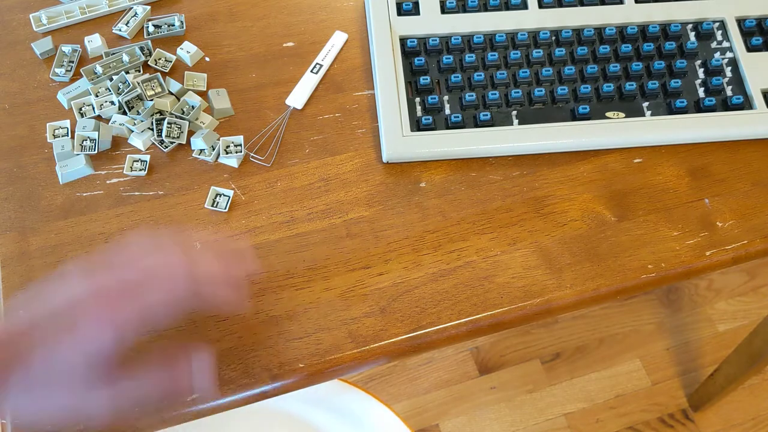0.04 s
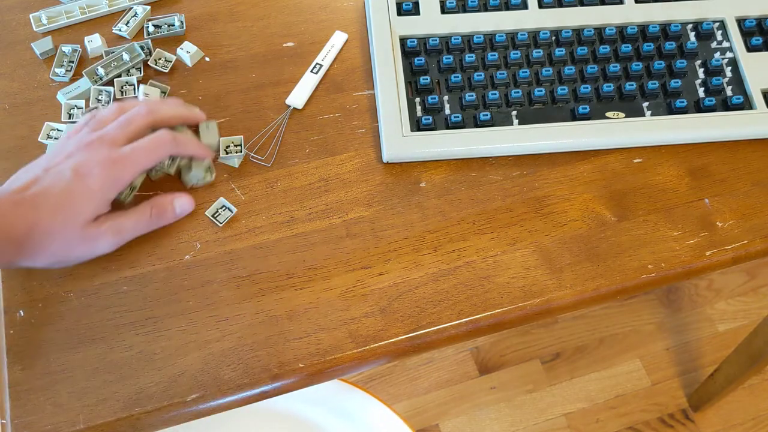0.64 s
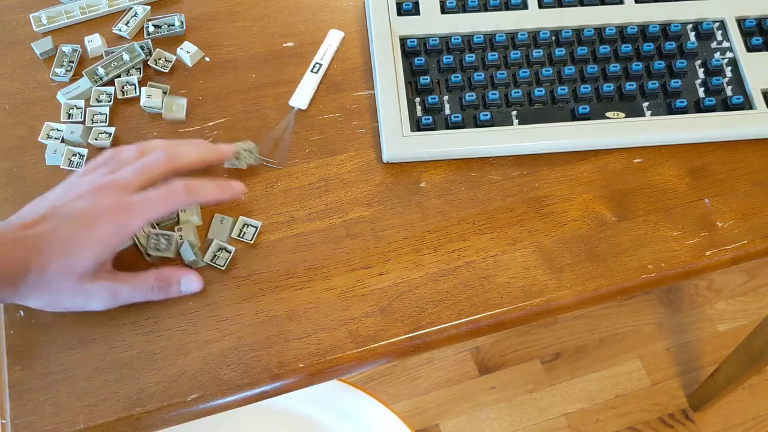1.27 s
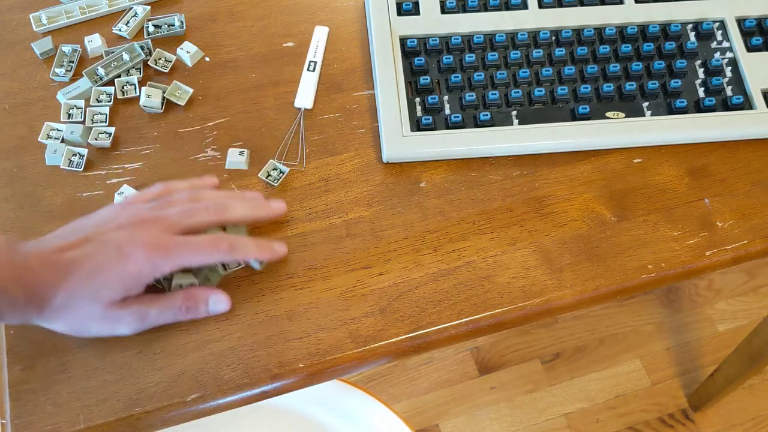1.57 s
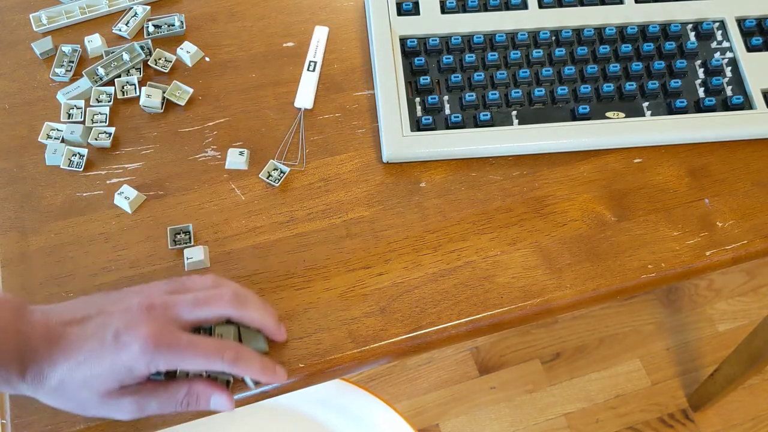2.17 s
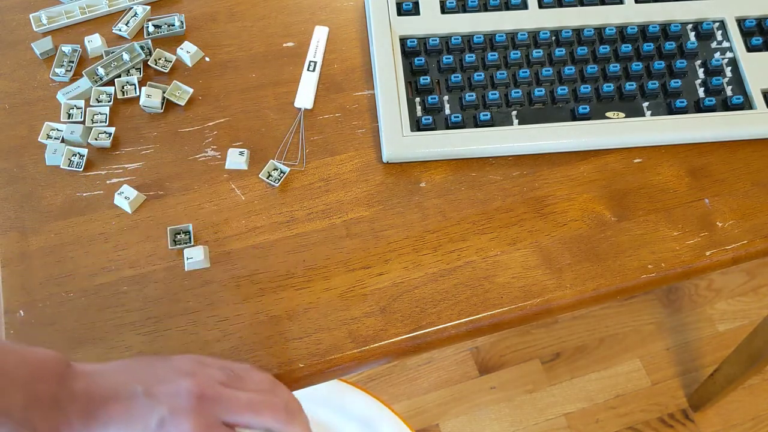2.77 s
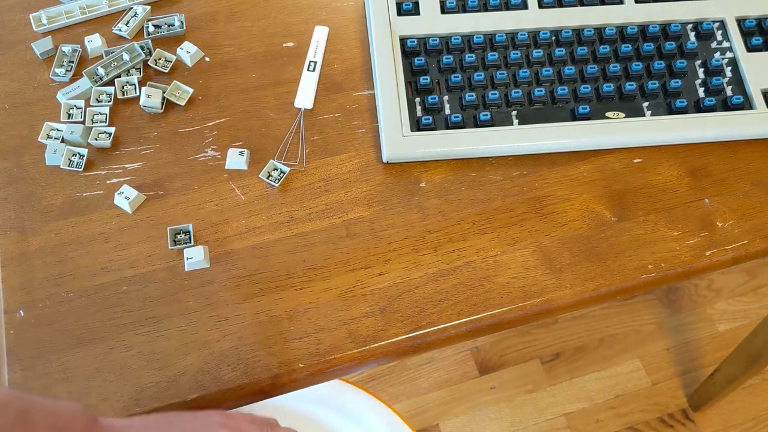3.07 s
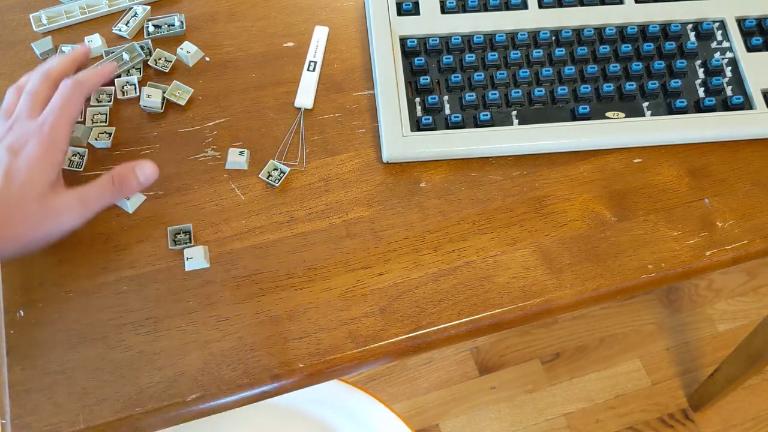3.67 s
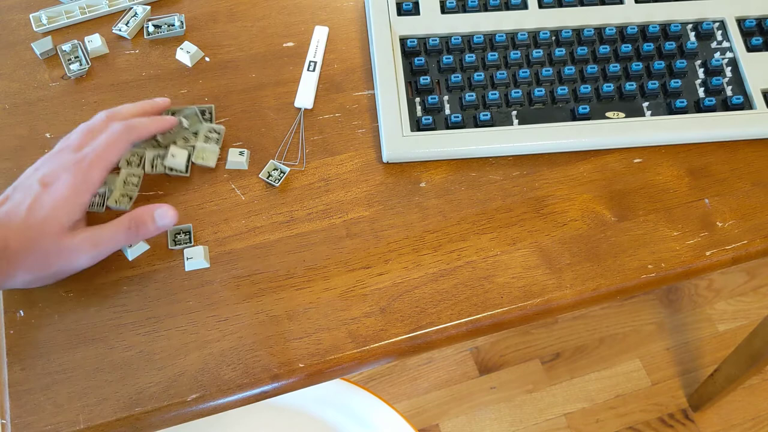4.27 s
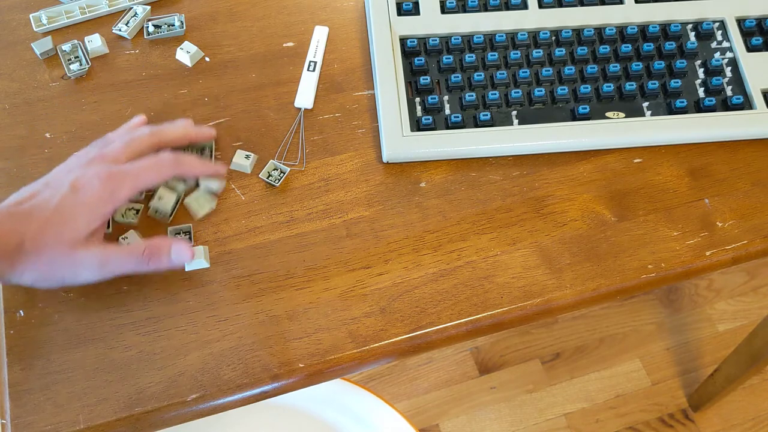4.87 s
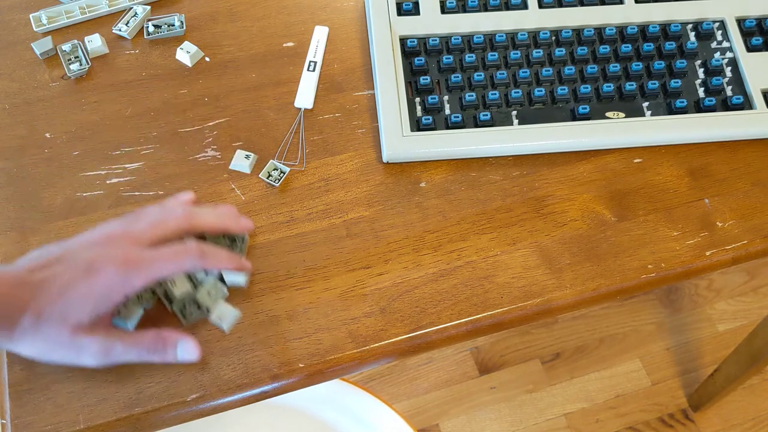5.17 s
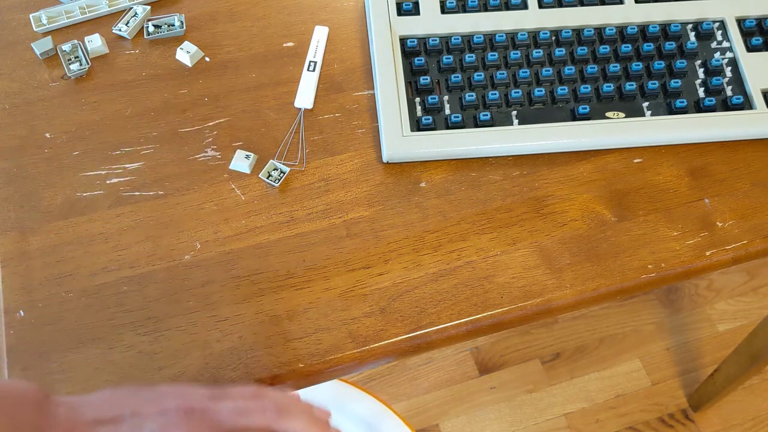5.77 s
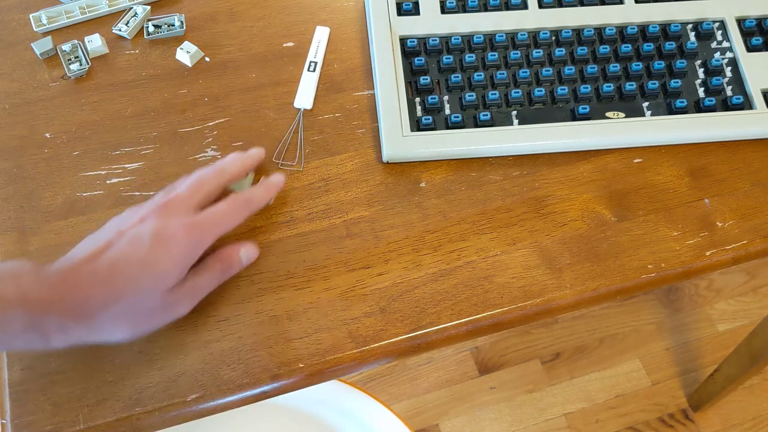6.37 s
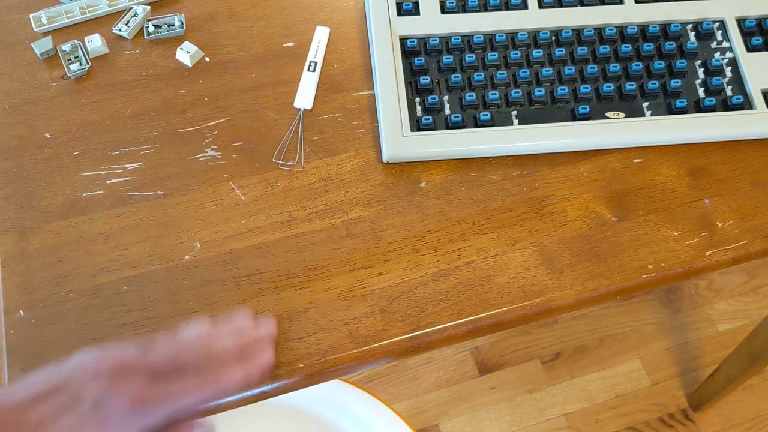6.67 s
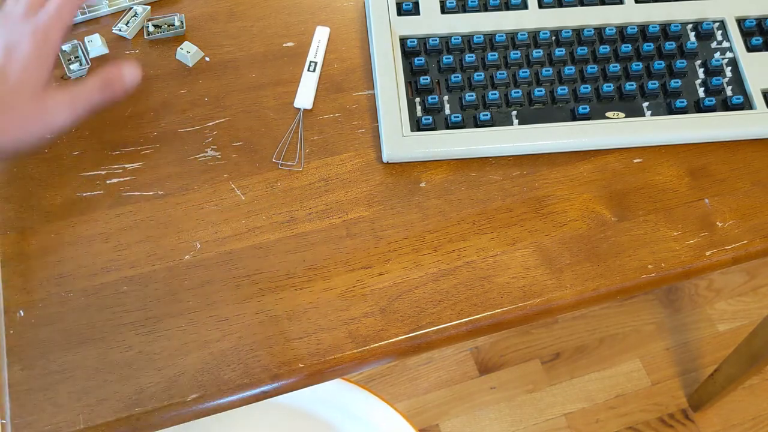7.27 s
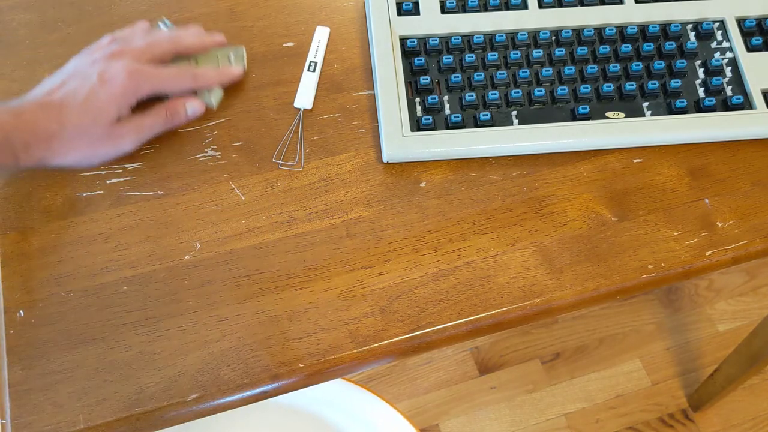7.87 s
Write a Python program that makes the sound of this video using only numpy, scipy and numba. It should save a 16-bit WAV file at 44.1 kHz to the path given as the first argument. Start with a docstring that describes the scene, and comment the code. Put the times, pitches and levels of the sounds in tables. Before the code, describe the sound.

A hand sweeps plastic keycaps over a wooden tabletop with light clicks, tipping them into a bowl in sharp, separate bursts.

```python
"""Keycaps swept into a bowl

A hand sweeps loose plastic keycaps across a wooden table and over its edge, a handful at a time.
The caps scrape on the wood and jostle each other, then tumble loudly onto the heap in a hollow bowl.
A bare, lively room answers every click; the close stereo microphone overloads on the loudest falls."""
import sys
import numpy as np
from scipy import signal
from scipy.fft import rfft, irfft, next_fast_len
from scipy.io import wavfile
from scipy.ndimage import uniform_filter1d, minimum_filter1d
from numba import njit

SR = 44100
rng = np.random.default_rng(int(sys.argv[2]) if len(sys.argv) > 2 else 0)


def put_to_file(sound):
    """Save the sound as 16-bit audio at rate SR, in the file named by the first command-line argument."""
    columns = np.atleast_2d(sound).T  # one column per channel
    safe = np.clip(columns, -1, 1)
    whole_steps = np.round(safe * 32767)
    wavfile.write(sys.argv[1], SR, whole_steps.astype(np.int16))


N = 349713
TIME = np.arange(N) / SR
RING_TIME = np.arange(1024) / SR

# The loudest caps landing in the bowl. Each row: time in seconds, relative level in dB,
# strongest ring in Hz, share of the bowl's knock in dB.
LANDINGS = [(0.002, 7.5, 9540, -29), (0.0204, 4, 7640, -27), (0.106, -6.5, 3210, -34),
            (0.125, -20, 7300, -16), (2.579, -1, 9100, -18.5), (2.5854, 0, 5770, -32.5),
            (2.717, -7.5, 10020, -26), (2.805, 1.5, 5540, -27.5), (2.8702, 10, 9220, -31),
            (2.8804, 5.5, 5440, -31.5), (2.926, 9.5, 10320, -28), (2.9444, 4, 7200, -25),
            (2.9785, 2.5, 7130, -32.5), (3.0233, 3, 7670, -40.5), (3.1617, 4.5, 11000, -38.5),
            (3.179, 4, 7100, -29.5), (3.202, 0, 7440, -25), (3.4142, -17, 6970, -12.5),
            (5.7314, 7, 5660, -23.5), (5.7773, 0.5, 10160, -24), (5.816, -1, 7840, -20),
            (5.829, 11, 9900, -20), (5.8502, 6, 9330, -41), (5.909, 5.5, 5670, -29),
            (5.9652, 4.5, 5500, -39.5), (6.0067, 6.5, 10010, -22.5), (6.0238, 0, 9200, -23),
            (6.037, 7, 9650, -34.5), (7.045, 5, 5870, -16), (7.077, 3.5, 9860, -28),
            (7.1793, -14, 3510, -15.5)]
# Tone of a falling cap's tick, of the heap's clack and of cap against cap on the table.
# Each row: frequency in Hz, relative level in dB.
FALL_TONE = [(60, -30), (200, -16.5), (750, -22), (1100, -15), (1500, -0.5), (2400, -9), (3500, 3.5),
             (4800, -2.5), (6500, 1), (10000, -2), (13000, -4.5), (15500, -8)]
HEAP_TONE = [(60, -26.5), (200, -27), (700, -20.5), (1000, -8.5), (1250, -3.5), (1700, 3.5), (2300, 4.5),
             (3300, 1.5), (4800, -5.5), (8000, -18.5), (16000, -30)]
CLICK_TONE = [(200, -25), (900, -7.5), (2000, -6), (4000, -1), (6000, -2.5), (9000, -2), (12500, -7.5),
              (15500, -20.5)]


def undb(db):
    """Decibels to gain."""
    return 10 ** (np.asarray(db) / 20)


def unit(x):
    """Scale to an average energy of one per channel."""
    return x / np.sqrt(np.mean(np.sum(x ** 2, axis=-1)))


def on_log(points, hz):
    """Read (Hz, value) points on a log-frequency axis."""
    f, value = np.transpose(points)
    return np.interp(np.log(np.maximum(hz, 1)), np.log(f), value)


def convolve(x, response):
    """Pass a sound through a response."""
    return signal.oaconvolve(x, response)[:N]


def colour(x, tone, size=2048):
    """Minimum-phase EQ through (Hz, dB) points that keeps the power of white noise."""
    cepstrum = irfft(np.log(undb(on_log(tone, np.fft.rfftfreq(size, 1 / SR)))))
    cepstrum[1:size // 2] *= 2
    cepstrum[size // 2 + 1:] = 0
    return convolve(x, unit(irfft(np.exp(rfft(cepstrum)))))


def add(track, s, sound):
    """Mix a short sound in at s seconds."""
    i = int(np.clip(s * SR, 0, N - 1))
    track[i:i + len(sound)] += sound[:N - i]


def mode(hz, width_hz):
    """One damped vibration of unit energy."""
    return unit(np.exp(-np.pi * width_hz * RING_TIME) * np.cos(2 * np.pi * hz * RING_TIME))


def gestures(t, rows, attack_s, release_s):
    """Gain at times t of (start, stop, dB, dB/s) gestures: each rises, swells or fades, and lets go."""
    gain = 0
    for start, stop, db, slope in rows:
        gate = np.clip((t - start) / attack_s, 0, 1) * np.clip(1 - (t - stop) / release_s, 0, 1)
        gain += gate * undb(db + slope * (np.clip(t, start, stop) - start))
    return gain


def wander(per_s):
    """A random drift that glides to per_s new values a second."""
    values = rng.standard_normal(per_s * N // SR + 2)
    return np.interp(TIME * per_s, np.arange(len(values)), values)


@njit
def moving_band(x, hz, width_hz):
    """State-variable band-pass whose centre moves."""
    y, band, low = np.empty(len(x)), 0., 0.
    for i in range(len(x)):
        g, damping = np.tan(np.pi * hz[i] / SR), width_hz / hz[i]
        v = (band + g * (x[i] - low)) / (1 + g * (g + damping))
        band, low = 2 * v - band, low + 2 * g * v
        y[i] = damping * v
    return y


def rattle(spread_db, per_s):
    """Times and uneven sizes of a stream of collisions, of unit power together."""
    chance = rng.random((per_s * N // SR, 2))
    times = (np.arange(len(chance)) + 2 * chance[:, 0]) / per_s
    sizes = undb(spread_db * chance[:, 1] ** 2)
    return times, sizes * np.sqrt(N / np.sum(sizes ** 2))


def rebounding(rows, gap_s, again_db):
    """A cap strikes twice: columns of (s, dB, ..) hits, each with a softer one an uneven gap later."""
    again = np.array(rows)
    again[:, 0] += gap_s * (.5 + rng.random(len(rows)))
    again[:, 1] += again_db
    return np.vstack([rows, again]).T


def ticks(times, gains, decay_s, rise_s=.00005, size=320):
    """A short gritty burst at each contact; a slip swells more slowly than a blow."""
    t = RING_TIME[:size]
    grit = rng.standard_normal((len(times), size)) * np.exp(-t / decay_s) * (1 - np.exp(-t / rise_s))
    grit *= (gains / np.linalg.norm(grit, axis=1))[:, None]
    places = (np.maximum(times, 0) * SR).astype(int)[:, None] + np.arange(size)
    return np.bincount(places.ravel(), grit.ravel(), N)[:N]


def shells(times, gains, detune, scatter_db, count=47):
    """Each contact rings one of many slightly different caps; the spot struck picks the modes."""
    # Modes of a keycap's shell. Each row: frequency in Hz, width in Hz, relative level in dB.
    modes = [(3300, 110, -6.5), (4000, 370, -7), (5704, 500, 3), (7210, 130, -11.5), (7440, 40, -4),
             (9386, 50, -2), (9930, 260, -4.5), (11580, 53, -8.5), (12700, 1600, -15.5), (14000, 110, -5.5)]
    tunings = 1 + detune * rng.standard_normal((count, len(modes)))
    caps = [np.array([undb(db) * mode(hz * k, width) for (hz, width, db), k in zip(modes, tuning)])
            for tuning in tunings]
    spots = rng.standard_normal((len(times), 2, len(modes)))
    weights = np.sign(spots[:, 0]) * undb(scatter_db * spots[:, 1])
    out = np.zeros(N)
    for i in np.flatnonzero(gains > 1e-6):
        add(out, times[i], gains[i] * unit(weights[i] @ caps[i % count]))
    return out


def free_rings(times, gains, pitches, width_hz):
    """A struck thing rings on in its strongest mode."""
    out = np.zeros(N)
    for s, gain, hz in zip(times, gains, pitches):
        add(out, s, gain * mode(hz, width_hz))
    return out


def right_lag(x):
    """The right channel lags in the mids, widening the sound; the treble stays in phase on both sides."""
    # Lag behind the left channel. Each row: frequency in Hz, phase in radians.
    phase_lag = [(100, 0.05), (1000, 0.55), (2000, 1.1), (3600, 1.8), (5400, 2), (7200, 0.1), (16000, 0.05)]
    size = next_fast_len(N + 1024)
    lag = on_log(phase_lag, np.fft.rfftfreq(size, 1 / SR))
    return irfft(rfft(x, size) * np.exp(-1j * lag), size)[:N]


def room(x, wet_db, build_s, left_db, band_count=14):
    """Direct sound plus a diffuse tail whose treble dies first, both leaning left by left_db."""
    # The bare room's decay. Each row: frequency in Hz, seconds to fall by 60 dB.
    t60 = [(200, 0.41), (530, 0.55), (1400, 0.43), (3700, 0.48), (7000, 0.41), (10000, 0.4), (15000, 0.33)]
    t = np.arange(SR * 3 // 4) / SR
    # early echoes are sparse and thicken quickly
    early = np.exp(-t / 0.022)
    echoes = rng.standard_normal((2, len(t)))
    echoes *= np.exp(rng.standard_normal((2, len(t))) * early - early ** 2)
    spectrum, hz = rfft(echoes), np.fft.rfftfreq(len(t), 1 / SR)
    # long waves reach both sides more alike
    alike = 0.25 / (1 + (hz / 1500) ** 2)
    spectrum = (spectrum + alike * spectrum[::-1]) / np.sqrt(1 + alike ** 2)
    centres = np.geomspace(100, 16000, band_count)
    bands = [irfft(spectrum * on_log(np.c_[centres, band], hz), len(t)) for band in np.eye(band_count)]
    tail = sum(band * np.exp(-np.log(1000) * t / on_log(t60, f)) for f, band in zip(centres, bands))
    response = undb(wet_db) * unit(tail * (1 - np.exp(-t / build_s)))
    response[:, 0] += 1  # the direct sound
    left, right = (convolve(x, side) for side in response)
    return np.array([left * undb(left_db / 2), right_lag(right) * undb(-left_db / 2)])


def pouring(t):
    """Strength of the collisions in the bowl at times t."""
    # Surges of falling caps. Each row: start and stop in seconds, opening level in dB, change in dB/s.
    surges = [(0.0, 0.216, -10, -60.5), (2.869, 3.145, -5, -41), (3.162, 3.429, -13, -59.5),
              (5.724, 5.835, -15, 2), (5.824, 5.999, 0, -115), (6.02, 6.122, -5.5, -260),
              (7.038, 7.15, -23, -130)]
    return gestures(t, surges, attack_s=0.0066, release_s=0.02)


def tumbling():
    """A handful rolls and settles on the heap in many small collisions."""
    times, sizes = rattle(spread_db=19, per_s=150)
    blows = sizes * pouring(times)
    contact = colour(ticks(times, blows * undb(-13), decay_s=0.00099), FALL_TONE)
    heap = colour(ticks(times, blows * undb(-13), decay_s=0.0013), HEAP_TONE)
    rings = shells(times, blows * undb(-8.5), detune=0.032, scatter_db=8)
    return room(contact + heap + rings, wet_db=0, build_s=0.0014, left_db=2.5)


def landings():
    """Single caps hit the bowl: a tick, the cap's ring and a clack from the heap below."""
    s, db, ring_hz, _ = rebounding(LANDINGS, gap_s=0.008, again_db=-6.5)
    blows = undb(db + 12.5)
    heap_db = -11.5 - 0.41 * db  # softer landings are duller: more heap in the mix
    contact = colour(ticks(s, blows * undb(-5.5), decay_s=0.0014), FALL_TONE)
    heap = colour(ticks(s, blows * undb(heap_db), decay_s=0.0033), HEAP_TONE)
    rings = shells(s, blows * undb(-2.5), detune=.025, scatter_db=9)
    rings += free_rings(s, blows * undb(-11.5), ring_hz, width_hz=100)
    return room(contact + heap + rings, wet_db=0, build_s=0.00084, left_db=2.5)


def bowl_knocks():
    """Landings and tumbles knock the hollow bowl; the heap cushions the heaviest tumbles."""
    # Modes of the bowl. Each row: frequency in Hz, width in Hz, relative level in dB.
    modes = [(353, 14, -5), (515, 190, 11), (494, 16, 6.5), (924, 67, 0.5)]
    knock = unit(sum(undb(level) * mode(hz, width) for hz, width, level in modes))
    s, db, _, knock_db = np.transpose(LANDINGS)
    times, sizes = rattle(spread_db=14.5, per_s=70)
    cushioned = np.minimum(sizes * pouring(times), 7)
    gains = np.r_[undb(db + knock_db + 14), cushioned * undb(-22)]
    out = np.zeros(N)
    for t, gain in zip(np.r_[s, times], gains):
        add(out, t, gain * knock)
    # a small bowl radiates long waves poorly
    out = colour(out, [(60, -18), (200, -19), (330, 6), (560, 0), (720, -12), (950, 6), (16000, 2)])
    return room(out, wet_db=-5, build_s=0.0084, left_db=7.5)


def room_tone():
    """Faint rumble and a little hiss, nearly alike on both sides."""
    # The quiet room. Each row: frequency in Hz, relative level in dB.
    tone = [(25, 2.5), (45, -9.5), (65, -6.5), (92, -1), (130, -14.5), (220, -12), (480, -19.5),
            (900, -22.5), (2000, -30), (6000, -27), (15500, -36)]
    shared, left, right = (colour(rng.standard_normal(N), tone, size=8192) for _ in range(3))
    return undb(-58.5) * (.9 * shared + .4 * np.array([left, right]))


def edge_knocks():
    """A cap tips over the table's edge: a hard tick, its own ring and a short knock of the wood."""
    # Each row: time in seconds, relative level in dB, ring in Hz, ring's share in dB, wood's share in dB.
    knocks = [(0.238, -15.5, 7370, 3, -39), (2.742, -10.5, 3440, -7, -18), (2.8009, -3, 2410, -6.5, -15.5),
              (2.858, -2, 9100, -2.5, -17), (3.085, -14.5, 3280, -3, -14), (3.0948, -19, 3280, 10, -21),
              (3.3428, -13, 5460, -22, -17.5)]
    s, db, ring_hz, ring_db, wood_db = np.transpose(knocks)
    blows = undb(db + 17.5)
    tone = [(60, -30.5), (200, -26), (900, -13.5), (2200, 1), (6000, -1.5), (10000, -8.5), (15500, -11)]
    contact = colour(ticks(s, blows, decay_s=0.00024), tone)
    rings = free_rings(s, blows * undb(ring_db), ring_hz, width_hz=120)
    wood = free_rings(s, blows * undb(wood_db), np.full(len(s), 470.), width_hz=160)
    return room(contact + rings + wood, wet_db=-2.5, build_s=0.0042, left_db=3.5)


def sweeping():
    """Pushed by the hand, cap rims stick and slip on the wood while the caps jostle each other."""
    # Strokes that gather caps (low chatter) or drag them to the edge (high chatter). Each row: start and
    # stop in seconds, scrape and jostle levels in dB, change in dB/s, chatter pitch in Hz,
    # chatter level in dB. All levels are relative.
    strokes = [(0.56, 0.68, -46.5, -39.5, 27, 850, -19), (0.68, 0.87, -46, -31, -17, 880, -1),
               (0.87, 1.33, -50.5, -44, -2.5, 950, -7), (1.33, 1.84, -47, -37.5, -7.5, 1400, -9.5),
               (1.84, 2.54, -51.5, -48, -16.5, 1450, 1), (4.006, 4.48, -49, -46.5, 4, 920, -3.5),
               (4.815, 5.12, -48.5, -41, -2, 880, -6), (5.12, 5.71, -49.5, -41.5, -2, 1450, 0),
               (6.4, 6.49, -49.5, -72, -19, 780, 0), (6.495, 6.664, -63, -55, 38, 900, -16),
               (6.659, 6.91, -64.5, -37, -9.5, 1150, 4), (7.62, 7.93, -54.5, -51, 41, 880, -20)]
    # Plastic scraping on wood. Each row: frequency in Hz, relative level in dB.
    wood_tone = [(100, -35.5), (240, -12.5), (330, -6), (550, 3.5), (740, -12), (900, 0.5), (1050, -1),
                 (1400, 1), (2000, -3), (3600, -2), (6000, -10.5), (16000, -8)]
    start, stop, scrape_db, jostle_db, slope, chatter_hz, chatter_db = np.transpose(strokes)

    def push(t, db):
        return gestures(t, zip(start, stop, db, slope), attack_s=0.014, release_s=0.012)

    times, sizes = rattle(spread_db=8, per_s=700)
    slips = ticks(times, sizes * push(times, scrape_db), decay_s=0.00045, size=96)
    scrape = colour(slips, wood_tone)
    stroke = np.maximum(np.searchsorted(start, TIME) - 1, 0)
    pitch = chatter_hz[stroke] * np.exp(0.07 * wander(per_s=14))  # strays as the caps turn
    chatter = moving_band(slips, pitch, width_hz=280.0) * undb(chatter_db[stroke] + 12.5)
    times, sizes = rattle(spread_db=18, per_s=330)
    blows = sizes * push(times, jostle_db) * undb(-4.5)
    jostle = colour(ticks(times, blows, decay_s=0.0032), CLICK_TONE)
    jostle += shells(times, blows, detune=.022, scatter_db=3.5)
    return scrape + chatter + jostle


def snaps():
    """Caps slip off one another under the hand; sharp edges add a bright scratch."""
    # Each row: time in seconds, relative level in dB, strongest ring in Hz, relative scratch in dB.
    clicks = [(0.5738, -31, 5140, -14), (0.7112, -18.5, 5680, -4), (1.024, -23, 9360, -11),
              (1.131, -27.5, 7000, 3), (1.202, -18, 7040, -14), (1.3086, -33, 9300, -13),
              (1.362, -24, 8650, 2), (1.435, -25.5, 7600, 2), (1.5376, -22.5, 9000, -18),
              (1.6344, -30, 9200, -18), (1.722, -29, 9600, -17), (1.7637, -22, 9340, -22),
              (1.812, -21, 7180, -23), (2.048, -33, 3700, -3), (2.5186, -35, 3600, -1),
              (4.0276, -26, 5530, -22.5), (4.1138, -20.5, 10600, 6.5), (4.15, -22, 10050, -8),
              (4.4467, -20.5, 5750, -18), (4.4715, -22, 5850, -24), (4.825, -38, 6060, -26),
              (4.866, -25, 5360, -18), (5.0967, -23, 6220, 2), (6.406, -41, 15200, 10.5),
              (6.4385, -43, 9600, 1.5), (7.664, -28, 5630, -1), (7.8063, -21.5, 5670, -16),
              (7.9096, -20, 5600, 1)]
    # A sharp edge's scratch. Each row: frequency in Hz, relative level in dB.
    edge_tone = [(3000, -30.5), (7000, -5.5), (11000, 1.5), (16000, 1)]
    s, db, ring_hz, edge_db = rebounding(clicks, gap_s=0.007, again_db=-3.5)
    blows = undb(db + 9.5)
    contact = ticks(s, blows, decay_s=0.0018, rise_s=.003, size=640)
    scratch = ticks(s, blows * undb(edge_db + 3.5), decay_s=.003, rise_s=.002, size=640)
    rings = shells(s, blows * undb(-10), detune=0.046, scatter_db=6)
    rings += free_rings(s, blows * undb(3.6), ring_hz, width_hz=280)
    return colour(contact, CLICK_TONE) + colour(scratch, edge_tone) + rings


def palm_brushes():
    """The palm hisses over the varnish."""
    # Each row: start and stop in seconds, relative opening level in dB, change in dB/s.
    brushes = [(2.134, 2.28, -34.5, -33.5), (6.584, 6.866, -39, 17.5)]
    # Skin on varnish. Each row: frequency in Hz, relative level in dB.
    tone = [(300, -26.5), (900, -11.5), (2000, -4.5), (3500, 7), (5700, -4.5), (8500, -5), (10200, 4.5),
            (12000, 8), (13500, -4.5), (16000, -7.5)]
    hiss = colour(rng.standard_normal(N), tone)
    return hiss * gestures(TIME, brushes, attack_s=0.07, release_s=0.06) * undb(-7)


def hand_bumps():
    """The hand meets the table with a soft, dull thud."""
    # Each row: time in seconds, relative level in dB, pitch in Hz.
    bumps = [(2.873, -36.5, 41.7), (5.83, -46, 44.3), (6.406, -40.5, 348), (6.438, -34.5, 500)]
    out, t = np.zeros(N), np.arange(SR // 5) / SR
    for s, db, hz in bumps:
        thud = t * np.exp(-t * hz / 2.7) * np.sin(2 * np.pi * hz * t)
        add(out, s, undb(db + 12) * unit(thud))
    return out


def scene():
    """Sweeps on the table alternate with falls into the bowl."""
    table = sweeping() + palm_brushes() + snaps() + hand_bumps()
    table = room(table, wet_db=4, build_s=0.00047, left_db=2.5)
    return table + edge_knocks() + landings() + tumbling() + bowl_knocks() + room_tone()


def record(dry):
    """A fast limiter catches the worst peaks, the rest flatten at full scale; the top is cut."""
    ceiling, window, top_hz = 1.25, 45, 15750  # the window is in samples, about 1 ms
    gain = np.minimum(1, ceiling / (np.abs(dry) + 1e-9))
    limited = dry * uniform_filter1d(minimum_filter1d(gain, window, axis=1), window, axis=1)
    clipped = limited / (1 + limited ** 8) ** (1 / 8)
    return signal.sosfilt(signal.ellip(10, .2, 70, top_hz, fs=SR, output="sos"), clipped)


dry = scene()
out = record(dry)
put_to_file(out)
```